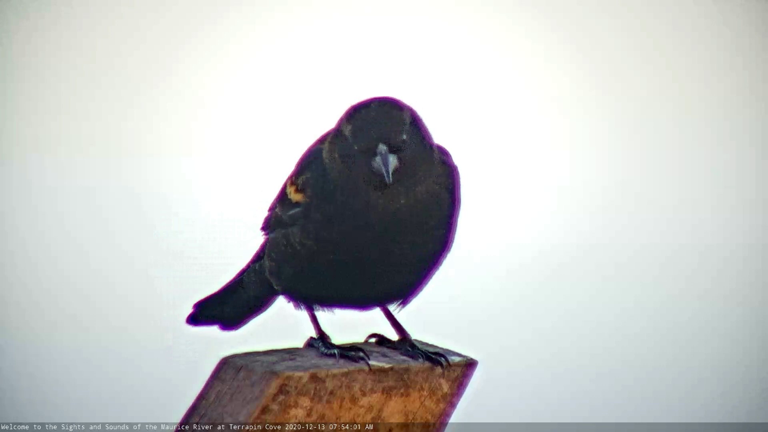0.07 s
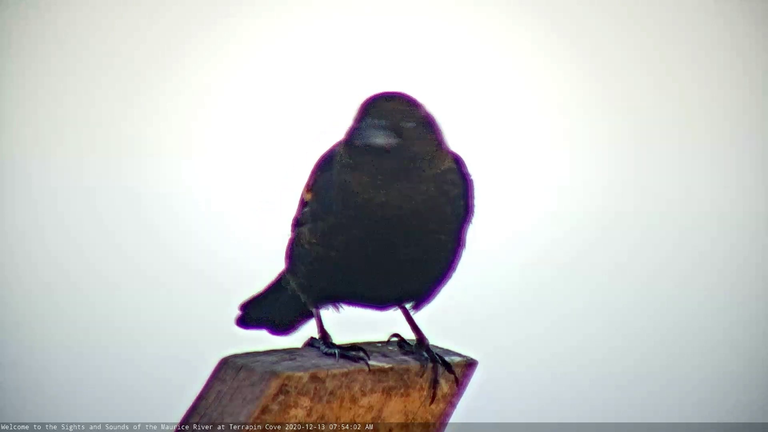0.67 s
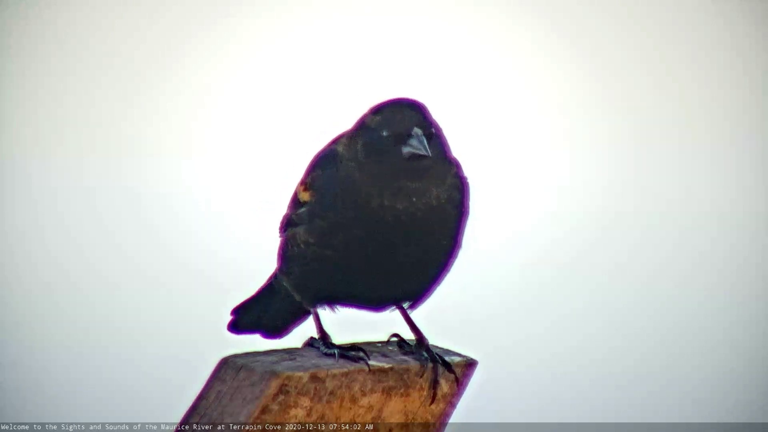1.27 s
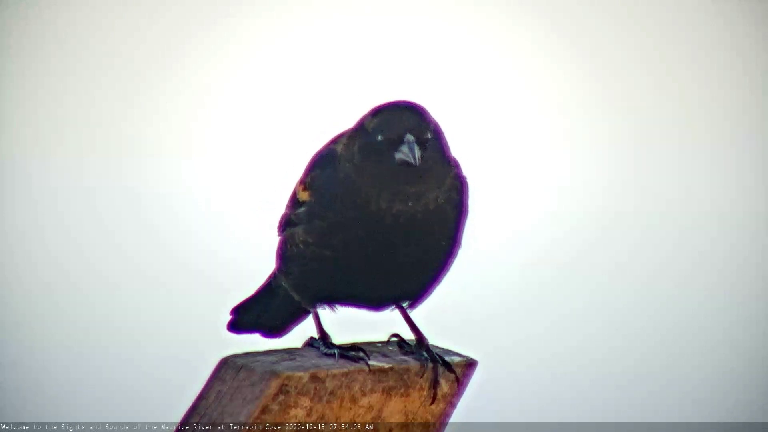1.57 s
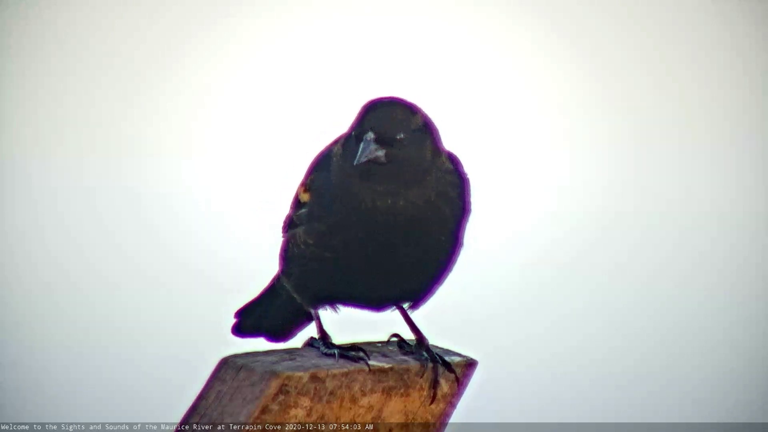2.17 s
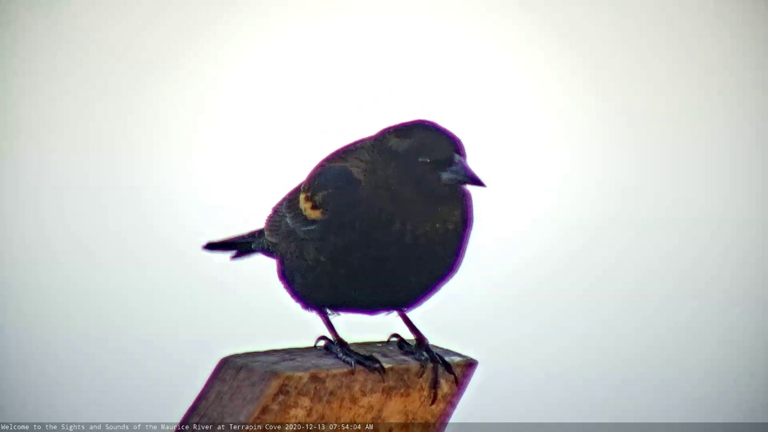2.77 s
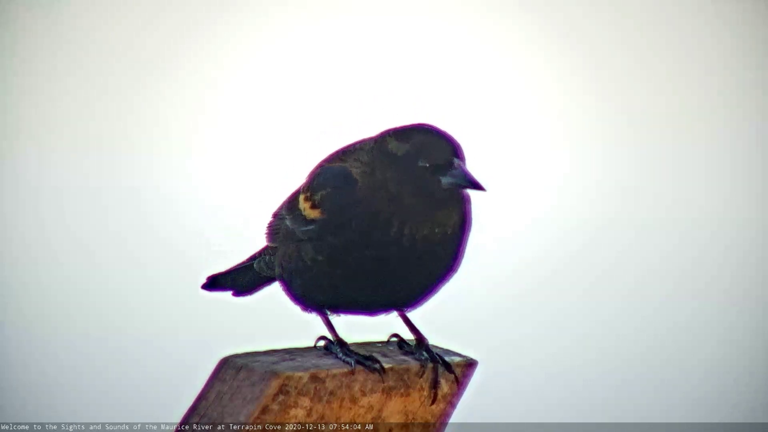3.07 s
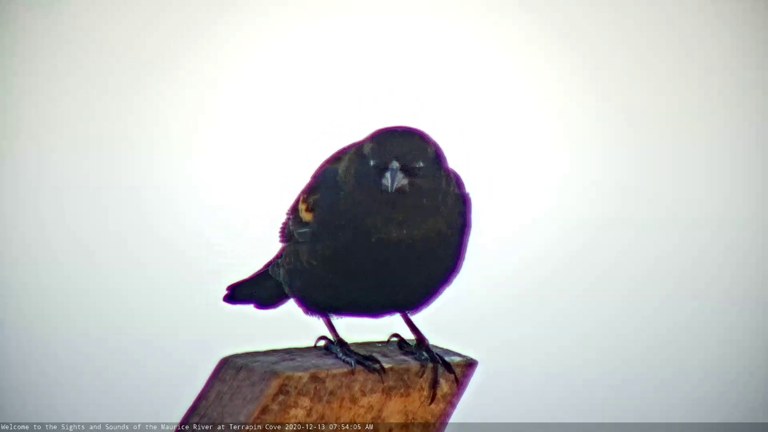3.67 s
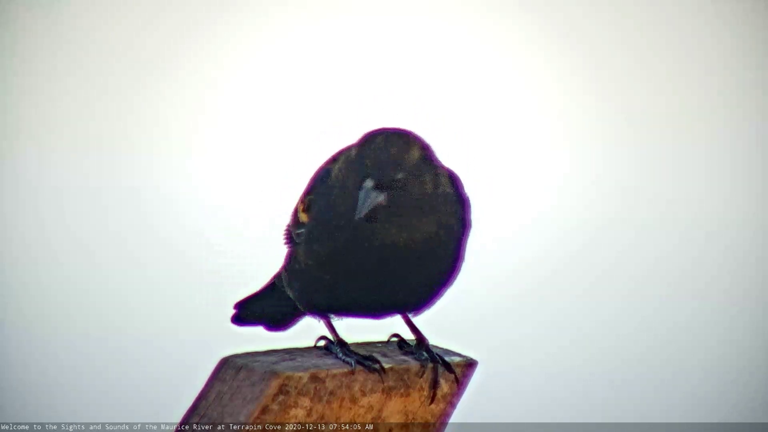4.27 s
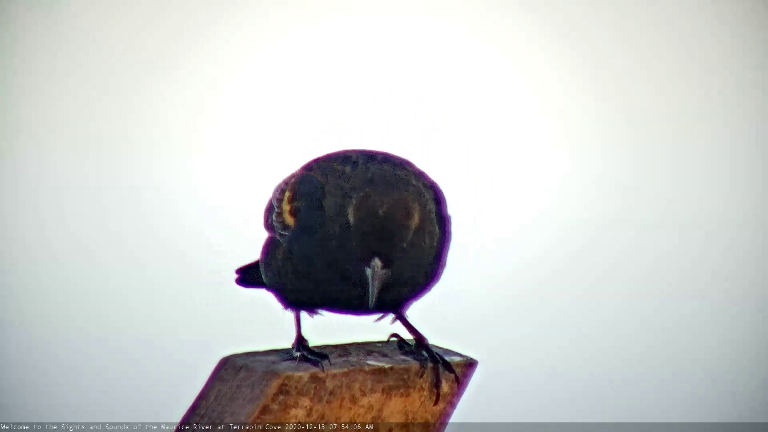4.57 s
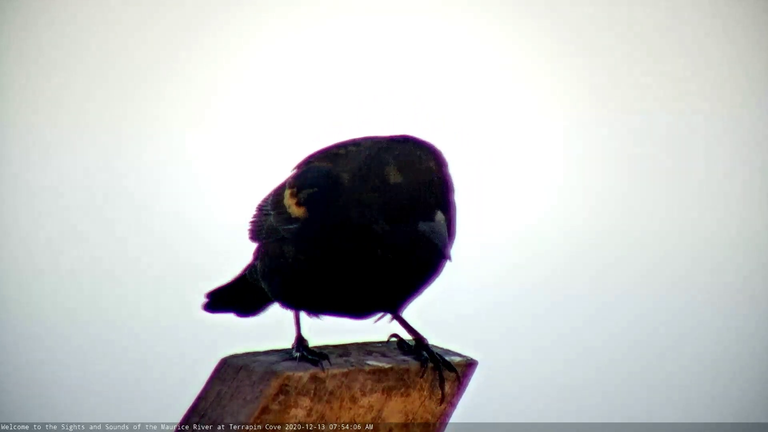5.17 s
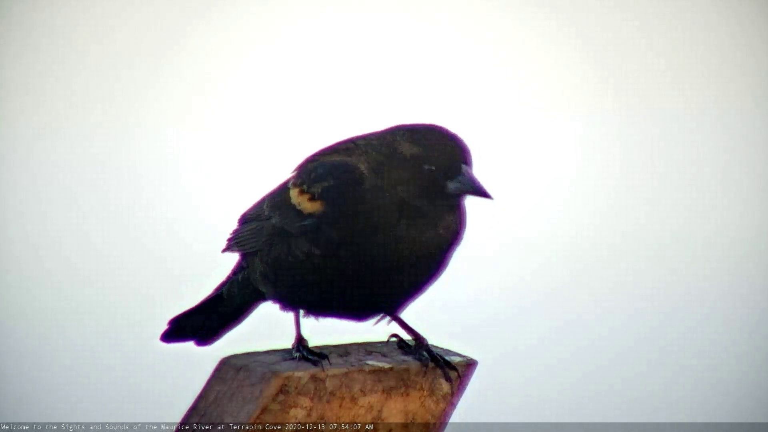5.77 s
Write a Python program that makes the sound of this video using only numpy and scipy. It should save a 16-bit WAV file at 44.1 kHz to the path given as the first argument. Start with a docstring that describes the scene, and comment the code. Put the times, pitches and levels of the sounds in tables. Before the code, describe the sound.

A nearby blackbird ruffles its feathers and chips sharply amid a flock's falling slurs and thin whistles, over faint hiss and distant rumble.

```python
"""First come distant machine rumble, air hiss and a thin electrical whine, and over them bird calls.
A blackbird flock calls from the trees with chips, buzzy falling slurs and a harsh chack; small birds
whistle farther off. Each call is a vibration of the syrinx, prolonged by scattering among the trees.
Close by, a blackbird on a post shakes out its feathers, which rustle by friction and snap as quills
slip free, and gives one sharp chip."""
import sys
import numpy as np
from scipy import signal
from scipy.fft import rfft, irfft, next_fast_len
from scipy.io import wavfile
from scipy.ndimage import map_coordinates

SR = 44100
rng = np.random.default_rng(int(sys.argv[2]) if len(sys.argv) > 2 else 0)


def master(y):
    """Save y as 16-bit WAV."""
    cut = np.clip(np.atleast_2d(y).T, -1, 1)
    pcm = np.round(cut * 32767)  # scale
    wavfile.write(sys.argv[1], SR, pcm.astype(np.int16))


N = 261513
T = np.arange(N) / SR

# Noise spectra. Each row: frequency in Hz, relative spectral density in dB.
RUMBLE_SPECTRUM = [(12, -56), (20, -14), (76, -2), (97, -7.5), (109, -8.5), (125, -10.5), (156, -10.5),
                   (195, -9), (232, -11), (362, -13), (510, -17), (1200, -22), (1560, -62), (2640, -120)]  # far machinery
AIR_SPECTRUM = [(590, -30), (1000, -22), (1250, -3.5), (1410, -1), (1520, -1.5), (1640, -0.5), (2000, -4),
                (2550, -2.5), (2860, 1), (3440, 1), (3690, -4), (5720, -8.7), (7630, -11.5), (13000, -15),
                (15800, -19.5)]  # open-air hiss
CHATTER_SPECTRUM = [(1500, -40), (2600, -14.5), (3450, 8), (4200, -5), (5700, -6), (7000, -20),
                    (10000, -34)]  # the distant flock
CHACK_SPECTRUM = [(1060, -43), (1800, -16), (2110, -25), (2430, -16), (2620, -20), (2680, -19),
                  (2850, -3.5), (4130, 1), (4420, -4), (4570, -25), (5480, -12), (7000, -51), (9100, -67),
                  (15400, -120)]  # throat resonances of the harsh call
FIDGET_SPECTRUM = [(400, -70), (1200, -25), (2500, -6), (3600, -2), (5600, 0), (7000, -14), (14000, -22)]  # small movements of feet and feathers
DRAUGHT_SPECTRUM = [(40, -20), (170, 0), (450, -4), (1200, -22), (3000, -70)]  # air stirred by the plumage
WING_SPECTRUM = [(350, -32), (650, -14), (1490, -13.5), (2600, -7), (3420, 3.5), (4310, 0), (5590, 1.5),
                 (7400, -11), (9500, -9.5), (12500, -12), (15500, -36)]  # stiff flight feathers
BODY_SPECTRUM = [(350, -34), (600, -9.5), (716, -15), (1490, -12), (1810, -11), (2680, -8), (3420, 5),
                 (4310, -1.5), (5590, -1.5), (7540, -17.5), (12500, -13.5), (15500, -38)]  # body feathers
SWISH_SPECTRUM = [(1200, -20), (1750, -4.5), (2050, -4), (2600, -8.5), (3600, -8), (6000, -62)]  # the return swing of the body
QUILL_SPECTRUM = [(800, -32), (3500, 6), (6000, -14), (9000, 7), (12000, -7), (15000, -40)]  # quill scraping on quill
# Reverberation of the trees. Each row: frequency in Hz, time to decay by 60 dB in seconds.
TREE_T60 = [(500, 0.27), (3300, 1), (8000, 0.72), (14000, 0.19)]
# Reflections from nearby surfaces. Each row: delay in seconds, gain in dB.
REFLECTIONS = [(.0036, -23), (.0076, -9), (0.0113, -17)]
# Machine hum and electrical whine. Each row: frequency in Hz, level in dB, phase wander in radians.
HUM_PARTIALS = [(67.3, -51.5, 0.76), (84.9, -48, 0.78), (137.7, -57, 0.77), (202.4, -58.5, 0.78),
                (332, -61, 0.92), (1594, -54, 0.33)]
# Envelope of the distant chatter. Each row: time in seconds, level in dB.
CHATTER_LEVELS = [(.1, -48), (.45, -42), (.9, -48), (1.68, -50), (1.85, -43.5), (2.55, -41.5), (3, -50),
                  (3.7, -45), (3.95, -59), (5.2, -58), (5.65, -52)]
# Thin whistles. Each row: start and length in seconds, first and last pitch in Hz, level in dB.
WHISTLE_NOTES = [(.2, .16, 3780, 3440, -41), (.865, .06, 1720, 1740, -43), (1.17, .22, 3760, 3380, -41),
                 (1.555, .1, 7600, 6570, -50), (2.772, .07, 7800, 6650, -32),
                 (3.51, .17, 3680, 3420, -37.5), (3.92, .14, 2940, 2930, -47), (4.63, .07, 1840, 1900, -49),
                 (5.08, .12, 1890, 1830, -46), (5.245, .05, 1790, 1720, -42), (5.39, .2, 3730, 3480, -39)]
# High "seets" that swoop onto a held note. Each row: start and length in seconds, level in dB.
SEET_NOTES = [(.39, .16, -48.5), (5.326, .22, -46)]
# Short rising "tsips". Each row: start and length in seconds, first and last pitch in Hz,
# level in dB, share sent to the trees.
TSIP_NOTES = [(1.524, .034, 6400, 6900, -30, .4), (4.129, .02, 6150, 7300, -26.5, .1)]
# One squeaky twitter. Each row: time in seconds, pitch in Hz, level in dB.
TWITTER_CONTOUR = [(1.425, 4220, -47), (1.447, 5700, -36), (1.462, 3930, -39), (1.473, 3600, -38),
                   (1.485, 4040, -33), (1.5, 3680, -48)]
# Buzzy falling slurs. Each row: start in seconds, level in dB, pitch factor.
SLUR_CALLS = [(0.516, -24.5, 0.99), (1.859, -27.5, 0.99), (3.029, -22.5, 1.015), (4.569, -25.3, 1.005),
              (5.612, -24.7, 1.005)]
# Wing and tail ruffles. Each row: time in seconds, level in dB, decay time of the power in seconds.
WING_STROKES = [(1.775, -42, .018), (2.464, -38, .028), (2.6, -39, .032), (2.683, -23, .022),
                (2.727, -27.5, .024), (2.772, -32, .012), (2.804, -26, .022), (2.877, -29, .012),
                (2.915, -32, .01)]
# The loudest quill snaps. Each row: time in seconds, relative level in dB, mid-sweep pitch in Hz.
QUILL_SNAPS = [(2.679, -11, 5400), (2.6885, -5.5, 5400), (2.7275, -11.5, 5040), (2.7615, -14.5, 5500),
               (2.8279, -13, 4380), (2.9538, -15, 4100), (3.3615, -18, 4200), (3.69, -21, 3500)]
# The arch of one chip. Each row: time from its top in seconds, pitch as a share of the top, level in dB.
CHIP_ARCH = [(-.0042, .42, -36), (-.0022, .68, -5), (-.0007, .98, -3), (.0003, 1.01, 0), (.0014, .9, .5),
             (.003, .69, -3.5), (.0058, .58, -6.5), (.0078, 0.43, -17)]
# Chips. Each row: time of the top in seconds, level in dB, top pitch in Hz, then the length factor
# and the depth exponent applied to the arch.
CHIP_CALLS = [(0.308, -16.5, 3400, 1.1, 0.66), (0.551, -29.5, 3600, 2.1, .5), (.662, -15, 3650, 1.9, 1.08),
              (.678, -20.5, 3404, 1.47, 0.76), (.692, -21, 3360, 1.9, .4), (.733, -25, 3205, 2.3, 0.289),
              (2.8704, -5.5, 3216, 1.03, 1.052), (3.889, -34, 2840, 1.2, .5), (4.2253, -26, 2650, 1.2, .45),
              (4.2301, -25, 3950, .9, .7), (4.978, -33, 2920, 0.99, .9), (5.0122, -27, 3200, 1, .9),
              (5.475, -30.5, 3100, 1.2, .9)]
# Treble response of the microphone. Each row: frequency in Hz, gain in dB.
MIC_RESPONSE = [(12500, -0.5), (13800, -1), (14700, 1), (15800, -7)]


def amp(db):
    return 10 ** (np.asarray(db) / 20)


def unit(x):
    return x / np.sqrt(np.mean(x ** 2) + 1e-20)


def along(points, hz):
    """Interpolation of (Hz, value) points on a logarithmic frequency axis."""
    f, v = np.transpose(points)
    return np.interp(np.log(hz + 1), np.log(f + 1), v)


def wobble(rate):
    """Smooth random modulation through `rate` knots a second."""
    return map_coordinates(rng.standard_normal(int(N * rate / SR) + 4), [T * rate])


def filtered(x, response):
    """Linear filtering: the spectrum is multiplied by a frequency response."""
    size = next_fast_len(N + SR // 2)
    return irfft(rfft(x, size) * response(np.fft.rfftfreq(size, 1 / SR)), size)[:N]


def coloured(x, spectrum):
    """Spectral shaping, normalised to rms 1."""
    return unit(filtered(x, lambda hz: amp(along(spectrum, hz))))


def noise(spectrum):
    return coloured(rng.standard_normal(N), spectrum)


def tone(hz):
    """A sine whose phase is the integral of its frequency."""
    return np.sin(2 * np.pi * np.cumsum(hz) / SR)


def add(track, start, sound):
    """Superposition of a sound on a track, from `start` seconds."""
    part = track[max(round(start * SR), 0):][:len(sound)]
    part += sound[:len(part)]


def glide(rows):
    """A pure tone modulated along (seconds, Hz, dB) points, with tapered ends."""
    s, hz, db = np.transpose(rows)
    t = np.arange(s[0], s[-1], 1 / SR)
    return tone(np.interp(t, s, hz)) * amp(np.interp(t, s, db)) * signal.windows.tukey(len(t), .1)


def scatter(x, t60):
    """Diffuse reverberation: a noise tail falls 60 dB in t60, given in seconds or as (Hz, seconds) rows."""
    hz, t, spectra = signal.stft(rng.standard_normal(SR), SR, nperseg=256)
    if not np.isscalar(t60):
        t60 = along(t60, hz)[:, None]
    tail = signal.istft(spectra * amp(-60 * t / t60), SR, nperseg=256)[1]
    return signal.fftconvolve(x, tail / np.linalg.norm(tail))[:N]


def treeline(x, delay_s=.125, t60=.71):
    """Echo: a far row of trees returns the sound late and blurred by scattering."""
    return np.interp(T - delay_s, T, scatter(x, t60), left=0)


def background(rumble_db=-43, air_db=-45):
    """Superposition blends hum, whine, distant chatter, far machinery and air hiss into a steady bed."""
    hum = sum(amp(db) * np.sqrt(2) * np.sin(2 * np.pi * hz * T + wander * wobble(9))
              for hz, db, wander in HUM_PARTIALS)
    chatter_db = np.interp(T, *np.transpose(CHATTER_LEVELS)) + wobble(35)
    chatter = amp(chatter_db) * noise(CHATTER_SPECTRUM)
    rumble = amp(rumble_db + .53 * wobble(4.83)) * noise(RUMBLE_SPECTRUM)
    return hum + chatter + rumble + amp(air_db) * noise(AIR_SPECTRUM)


def twitter(octave_db=-15, rough_db=3.5):
    """Fast random amplitude modulation makes a tone and its octave sound scratchy."""
    squeak = glide(TWITTER_CONTOUR) + amp(octave_db) * glide(np.array(TWITTER_CONTOUR) * [1, 2, 1])
    return squeak * amp(rough_db * wobble(900)[:len(squeak)])


def small_birds(seet_from_hz=10150, seet_held_hz=7760, tsip_peak_share=.22, jitter_s=2e-5, flutter_db=1.5):
    """Frequency modulation: thin, slightly unsteady tones glide, swoop or twitter among the trees."""
    far, close = np.zeros(N), np.zeros(N)
    progress = np.array([0, .35, 1])  # onset, peak and end of a whistle
    for start, length, from_hz, to_hz, db in WHISTLE_NOTES:
        pitch = from_hz + (to_hz - from_hz) * progress
        add(far, start, glide(np.column_stack([start + length * progress, pitch, [db - 5, db, db - 5]])))
    for start, length, db in SEET_NOTES:
        seet = glide([(0, seet_from_hz, db), (.05, seet_held_hz, db - 2.5), (length, seet_held_hz, db - 5)])
        add(far, start, seet)
    for start, length, from_hz, to_hz, db, tree_share in TSIP_NOTES:
        peak = (tsip_peak_share * length, from_hz + tsip_peak_share * (to_hz - from_hz), db)
        tsip = glide([(0, from_hz, db - 20), peak, (length, to_hz, db - 20)])
        add(far, start, tree_share * tsip)
        add(close, start, (1 - tree_share) * tsip)
    add(far, TWITTER_CONTOUR[0][0], twitter())
    unsteady = [(T + jitter_s * wobble(250)) * SR]  # timing jitter blurs the highest notes most
    far = map_coordinates(far, unsteady) * amp(flutter_db * wobble(110))
    direct = amp(-.5) * far + map_coordinates(close, unsteady)
    near = amp(-11) * scatter(far, t60=.12)
    return direct + near + amp(-8) * scatter(far, TREE_T60) + amp(-14) * treeline(far)


def slurs(first_hz=3830, step_hz=98, rise_hz=290, quaver_hz=130, buzz_db=2, sag_db_per_s=12):
    """Reverberation smears a run of tiny rising notes, stepping down and slowing, into a falling slur."""
    dry = np.zeros(N)
    for start, db, pitch_factor in SLUR_CALLS:
        for k, (accent, detune) in enumerate(rng.standard_normal(size=(10, 2))):
            offset_s = .0137 * k ** 1.26
            length_s = .012 + .0012 * k
            hz = pitch_factor * (first_hz - step_hz * k) + 45 * detune
            onset_db = -8 * max(1 - offset_s / .045, 0)  # the slur starts softly
            note_db = db + onset_db - sag_db_per_s * offset_s + 1.5 * accent
            sweep = np.linspace(-1, 1, int(length_s * SR))
            quaver = quaver_hz * np.sin(2 * np.pi * (sweep + rng.random()))
            swell = np.sin(np.pi * ((sweep + 1) / 2) ** .91) ** 2  # quick rise, slower fall
            note = amp(note_db) * swell * tone(hz + rise_hz * sweep + quaver)
            add(dry, start + offset_s - length_s / 2, note)
    dry *= amp(buzz_db * wobble(300))  # the syrinx rattles within each note
    near = amp(-5) * scatter(dry, t60=.28)
    far = amp(-2.3) * scatter(dry, t60=.99) + amp(-8) * treeline(dry)
    return amp(-.8) * dry + near + far


def chack(start_s=2.034, level_db=-24, attack_s=.009, hold_s=.026, release_db_per_s=480):
    """Source and filter: irregular bursts of the syrinx excite the throat resonance in a hoarse call."""
    t = T - start_s
    release_db = release_db_per_s * np.maximum(t - attack_s - hold_s, 0)
    envelope = np.clip(t / attack_s, 0, 1) * amp(level_db - release_db)
    dry = envelope * unit(noise(CHACK_SPECTRUM) * amp(wobble(350)))
    return dry + amp(-9) * scatter(dry, TREE_T60) + amp(-12) * treeline(dry)


def fidgets(per_second=7, level_db=-46, spread_db=3, decay_s=.008):
    """Friction gives faint, short rustles at random moments as the bird shifts on the post."""
    kicks = (rng.random(N) < per_second / SR) * amp(level_db + spread_db * rng.uniform(-1, 1, N))
    envelope = signal.lfilter([1], [1, -np.exp(-1 / (decay_s * SR))], kicks)
    return envelope * noise(FIDGET_SPECTRUM)


def stroke(peak_s, decay_s, rise_s=.0047):
    """The friction envelope of one feather stroke: an exponential rise, then a steepening decay."""
    t = T - peak_s
    return np.exp(np.minimum(t / rise_s, -t / (2 * decay_s)) - np.maximum(t / (4 * decay_s), 0) ** 2)


def rustle(spectrum, ticks_per_s=5000, tick_share=.42, quills_per_s=200):
    """Friction between barbs gives hiss and dense ticks, joined by sparse quill ticks and stirred air."""
    ticks = rng.standard_normal(N) * (rng.random(N) < ticks_per_s / SR) * amp(2.7 * wobble(200))
    quills = rng.uniform(-1, 1, N) * (rng.random(N) < quills_per_s / SR)
    barbs = np.sqrt(tick_share) * coloured(ticks, spectrum) + np.sqrt(1 - tick_share) * noise(spectrum)
    return barbs + amp(-6.5) * coloured(quills, spectrum) + amp(-19) * noise(DRAUGHT_SPECTRUM)


def body_swings(start_s=2.957, period_s=.0765, slowing_s=.00092, hold_s=.53, fade_db_per_s=55):
    """An oscillation that slows and at last dies away. Each row: time in seconds, relative level in dB."""
    k = np.arange(10)
    t = period_s * k + slowing_s * k ** 2
    return np.column_stack([start_s + t, -fade_db_per_s * np.maximum(t - hold_s, 0)])


def plumage(rub_db=-29.3, rub_decay_s=.018, swish_db=-35, swish_lag_s=.032, swish_width_s=.0091):
    """Friction noise follows the motion: the wings ruffle, then each body swing rubs and swishes back."""
    wings = sum(amp(db) * stroke(s, decay_s) for s, db, decay_s in WING_STROKES)
    body = sum(amp(rub_db + db) * stroke(s, rub_decay_s) for s, db in body_swings())
    swish = sum(amp(swish_db + db) * np.exp(-.5 * ((T - s - swish_lag_s) / swish_width_s) ** 2)
                for s, db in body_swings())
    dry = wings * rustle(WING_SPECTRUM) + body * rustle(BODY_SPECTRUM) + swish * noise(SWISH_SPECTRUM)
    return dry + amp(-10) * scatter(dry, TREE_T60)


def quill_snaps(rise_s=.00077, sweep=.4, grit=.23):
    """Stick and slip: a quill comes free with a damped tick of a few cycles whose pitch drops."""
    out = np.zeros(N)
    age = np.arange(SR // 200) / SR / rise_s  # in rise times
    envelope = age ** 2 * np.exp(2 - 2 * age)
    bend = 1 + sweep * (2 * np.exp(-age / 2) - 1)
    scrape = noise(QUILL_SPECTRUM)
    for s, db, hz in QUILL_SNAPS:
        tick = tone(hz * bend) + grit * scrape[round(s * SR):][:len(age)]
        add(out, s - rise_s, amp(db - 3) * envelope * tick)
    return out


def throat(hz, centre_hz=2600, width_hz=900):
    """Resonance of the throat: a second-order band-pass response added to a flat one."""
    resonance = 1j * hz * width_hz / (centre_hz ** 2 - hz * hz + 1j * hz * width_hz)
    return amp(-2) + amp(-6) * resonance


def chips(octave_db=-25, rasp_db=2.6):
    """Source and filter: a fast, hoarse arch of pitch passes the throat and reflects off near surfaces."""
    source = np.zeros(N)
    t, pitch_share, arch_db = np.transpose(CHIP_ARCH)
    for top_s, db, top_hz, stretch, depth in CHIP_CALLS:
        arch = np.column_stack([top_s + stretch * t, top_hz * pitch_share ** depth, db + arch_db])
        add(source, arch[0, 0], glide(arch) + amp(octave_db) * glide(arch * [1, 2, 1]))
    dry = filtered(source * amp(rasp_db * wobble(1200)), throat)
    out = dry + amp(-12) * scatter(dry, t60=.15) + amp(-21) * scatter(dry, TREE_T60)
    for delay_s, db in REFLECTIONS:
        add(out, delay_s, amp(db) * dry)
    return out


def scene():
    """Superposition: the pressures of calls, feathers and background add in one channel."""
    calls = chips() + slurs() + small_birds() + chack()
    feathers = plumage() + quill_snaps() + fidgets()
    return (calls + feathers + background())[None]


def record(dry, mirror_hz=16000, treble_from_hz=2300, cutoff_hz=15850, silence_s=.075):
    """Spectral imaging: an outdoor camera's crude resampling mirrors the birds into the top octave."""
    treble = filtered(dry[0], lambda hz: 1 - 1 / (1 + (hz / treble_from_hz) ** 8))
    image = amp(-12) * treble * np.cos(2 * np.pi * mirror_hz * T)
    gated = (dry[0] + image) * (T > silence_s)  # the sound opens after a moment of silence
    return filtered(gated, lambda hz: amp(along(MIC_RESPONSE, hz)) * (hz < cutoff_hz))[None]


dry = scene()
out = record(dry)
master(out)
```